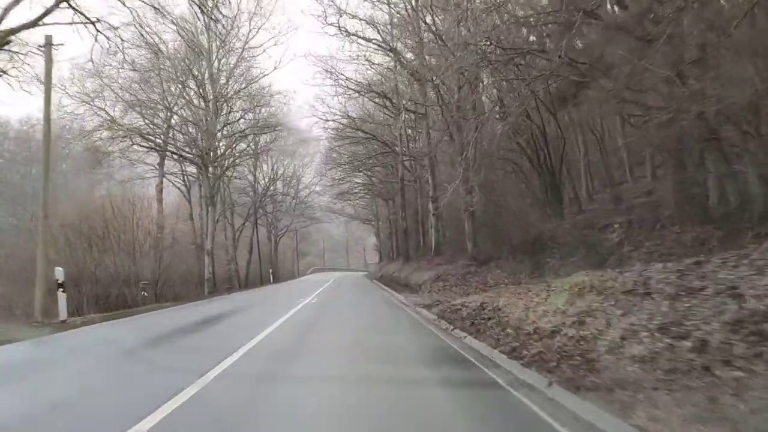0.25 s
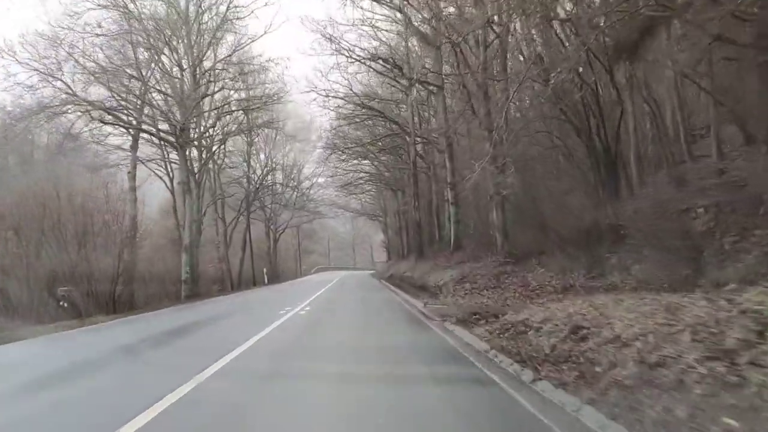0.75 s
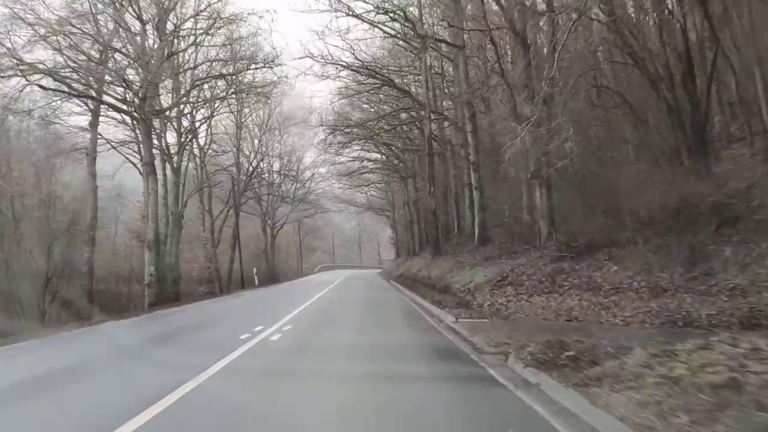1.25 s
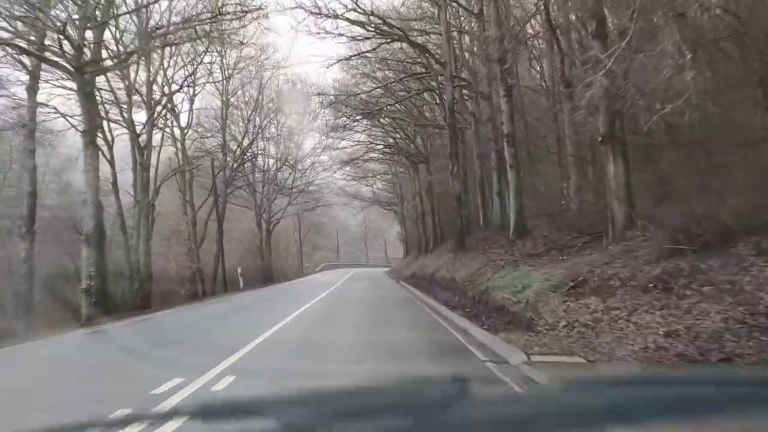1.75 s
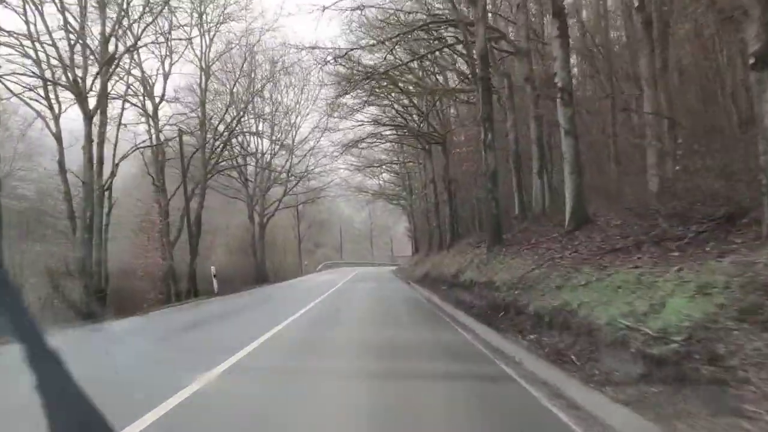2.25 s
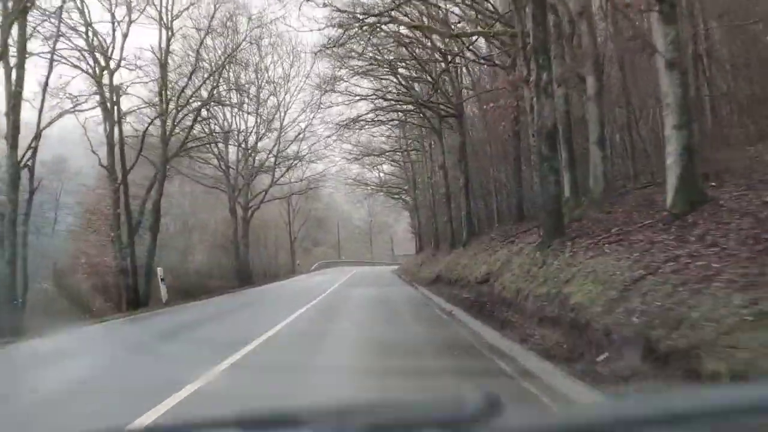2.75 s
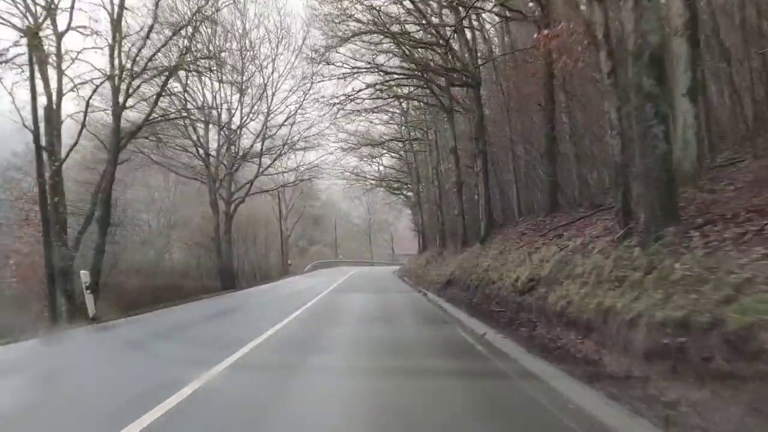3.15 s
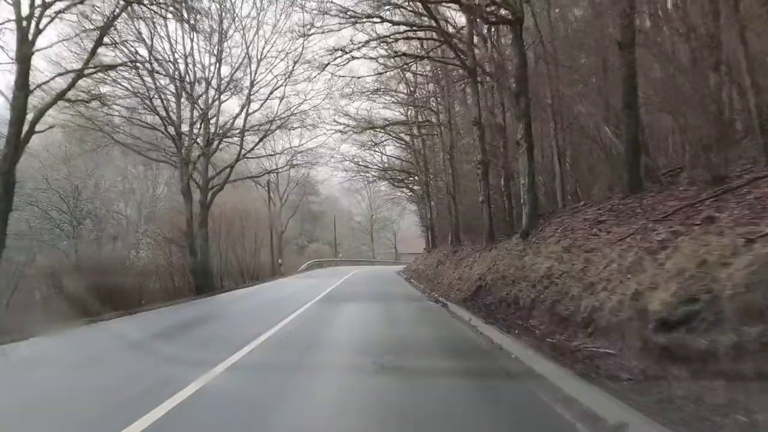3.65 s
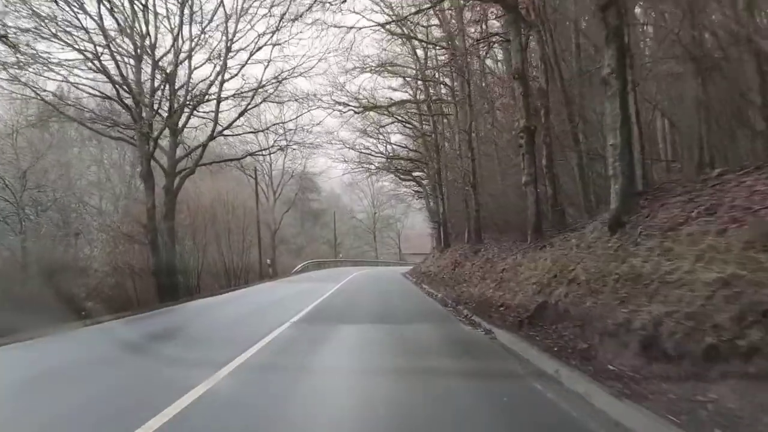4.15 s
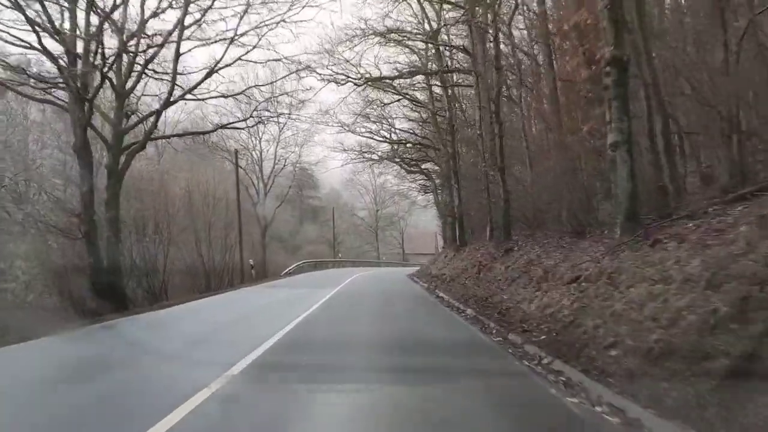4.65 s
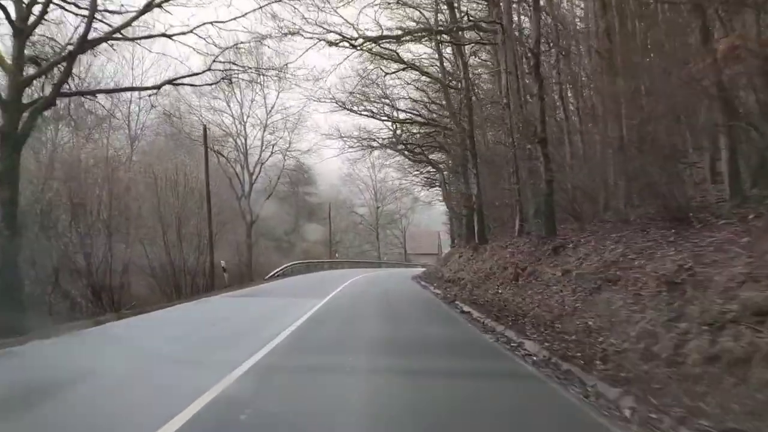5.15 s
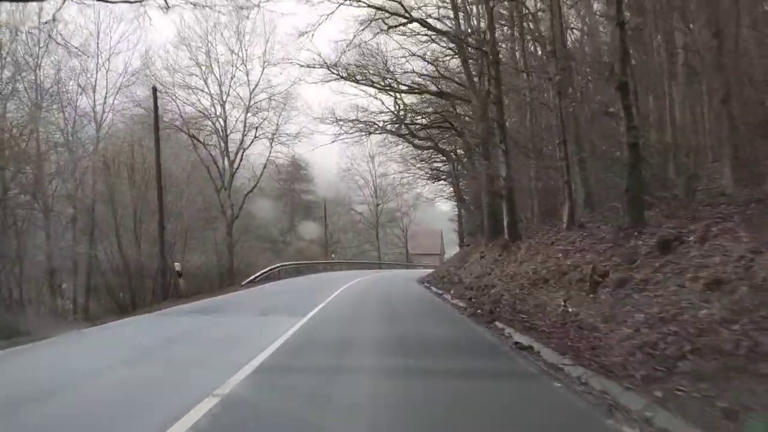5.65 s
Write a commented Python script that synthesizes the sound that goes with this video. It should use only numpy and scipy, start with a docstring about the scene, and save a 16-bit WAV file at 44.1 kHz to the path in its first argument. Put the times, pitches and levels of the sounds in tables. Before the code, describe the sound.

Low road rumble and tyre hum fill the cabin of a moving car, with light spray hissing outside. The engine hum is strongest at first and then sinks away. The windscreen wipers make a single pass, knocking dully twice and whirring quietly. Later, rougher asphalt brings a deep boom and a thud, while a small metal object clinks faintly and plastic trim ticks near the microphone inside the car.

```python
"""An engine drones inside a car coasting on a wet country road, its firing harmonics fading as the
driver lifts off. The tyres hum on multiples of the wheel rate, and the road forces the body into
rumble, roar and a resonant boom. Spray and air hiss outside. The wipers sweep up and back with two
dull knocks. Trim ticks and something rustles faintly; near the end a small metal object clinks."""
import sys
import numpy as np
from scipy import signal
from scipy.fft import rfft, irfft
from scipy.io import wavfile
from scipy.ndimage import uniform_filter1d

SR = 44100
rng = np.random.default_rng(int(sys.argv[2]) if len(sys.argv) > 2 else 0)


def master_out(mix):
    """Clip the mix to full scale and print it as 16-bit PCM to the path in sys.argv[1]."""
    frames = np.transpose(np.atleast_2d(mix))
    ceiling = np.clip(frames, -1, 1)
    pcm = np.round(ceiling * 32767).astype(np.int16)
    wavfile.write(sys.argv[1], SR, pcm)


N = 259749
TIME = np.arange(N) / SR
BINS_HZ = np.fft.rfftfreq(N, 1 / SR)


def gain_of(db):
    """Decibels to amplitude ratio."""
    return 10 ** (np.asarray(db) / 20)


def unit_rms(x):
    """Normalisation to an rms of one."""
    return x / np.sqrt(np.mean(abs(x) ** 2) + 1e-20)


def at_hz(points, hz):
    """Interpolation of a spectrum on a log-frequency axis."""
    f, value = np.transpose(points)
    return np.interp(np.log(hz + 1), np.log(f + 1), value)


def curves(rows):
    """Linear interpolation of each column of a timed table, one value a sample."""
    time_s, *columns = np.transpose(rows)
    return [np.interp(TIME, time_s, column) for column in columns]


def add(mix, start_s, sound):
    """Superposition of a stereo sound on the mix."""
    part = mix[:, max(round(start_s * SR), 0):][:, :sound.shape[1]]
    part += sound[:, :part.shape[1]]


def pan(balance_db):
    """Channel gains for a level difference; balance is left minus right."""
    return gain_of([[balance_db / 2], [-balance_db / 2]])


def drift(rate_hz):
    """Random modulation: low-passed noise of unit rms."""
    return unit_rms(irfft(rfft(rng.standard_normal(N)) * np.exp(-(BINS_HZ / rate_hz) ** 2), N))


def scatter(spectrum, t60_s, tilt_db_per_octave=0):
    """Diffuse scattering: the cabin spreads a click into exponentially decaying noise."""
    t, hz = np.arange(SR // 5) / SR, np.fft.rfftfreq(SR // 5, 1 / SR)
    shape = gain_of(at_hz(spectrum, hz) + tilt_db_per_octave * np.log2(np.maximum(hz, 4000) / 8000))
    noise = irfft(rfft(rng.standard_normal((2, len(t)))) * shape, len(t))
    return unit_rms(noise) * gain_of(-60 * t / t60_s)


# Likeness of left and right: frequency_hz, correlation (clipped to +-1 in use)
COHERENCE = [(35, 1.16), (60, 1.2), (92, 0.66), (140, 1.3), (210, 0.56), (330, 0.88), (500, 0.39),
             (770, -0.18), (1170, -0.21), (1790, 0.09), (4000, 0)]
# Level difference across the cabin: frequency_hz, balance_db
CABIN_BALANCE = [(60, 0), (500, 0.5), (770, 0.5), (1170, -1), (1790, -0.5), (2740, -3.5), (4190, -6),
                 (6400, -13), (8000, 17.5), (9500, 5.3), (15000, -7.5)]
def cabin_noise(spectrum):
    """Spatial coherence: left and right noise are alike in the bass, unrelated in the treble."""
    common, independent = rfft(rng.standard_normal((2, N)))
    correlation = np.clip(at_hz(COHERENCE, BINS_HZ), -1, 1)
    right = correlation * common + np.sqrt(1 - correlation ** 2) * independent
    lean = gain_of(at_hz(CABIN_BALANCE, BINS_HZ) / 2)
    pair = irfft(np.array([common * lean, right / lean]) * gain_of(at_hz(spectrum, BINS_HZ)), N)
    return pair / pair.mean(0).std()


def partial(hz, waver, waver_hz):
    """A tone under random amplitude and phase modulation; coherence sets the left-right phase angle."""
    cycles = np.cumsum(hz) / SR + rng.random()
    wander = unit_rms(1 + waver * (drift(waver_hz) + 1j * drift(waver_hz)))
    angle = np.arccos(np.clip(at_hz(COHERENCE, hz.mean()), -1, 1)) * rng.choice([-.5, .5])
    phase = 2 * np.pi * cycles + np.array([[angle], [-angle]])
    return np.sqrt(2) * (wander * np.exp(1j * phase)).real


def reflections(x, echo_db=-14, spread_s=.012, count=8):
    """Comb filtering: early echoes from glass and dashboard ripple the spectrum."""
    taps = np.zeros((2, SR // 20))
    delays = (rng.uniform(.05, 1, (2, count)) * spread_s * SR).astype(int)
    echoes = gain_of(echo_db) * rng.choice([-1, 1], delays.shape) / np.sqrt(count)
    np.put_along_axis(taps, delays, echoes, 1)
    # long waves fill the small cabin evenly
    taps = signal.sosfilt(signal.butter(2, 900, "highpass", fs=SR, output="sos"), taps)
    taps[:, 0] += 1  # direct sound
    return signal.oaconvolve(x, taps / np.linalg.norm(taps, axis=1, keepdims=True), axes=1)[:, :N]


# Soft rubs in the cabin: start_s, length_s, level_db, balance_db
RUBS = [(0.032, 0.24, -64, -3.5), (0.264, .12, -60.5, 0), (5.774, 0.099, -61, -1)]
# Rubbing spectrum: frequency_hz, relative_db
RUB_SPECTRUM = [(1500, -20), (3500, 1), (6000, 4), (8000, 2), (9500, -16), (15000, -14)]
def rustles(grain_db=4):
    """Friction noise: brief rubbing gives bright sound in uneven clumps."""
    clumps = rng.standard_normal((2, N)) * gain_of(grain_db * drift(90))
    grains = unit_rms(irfft(rfft(clumps) * gain_of(at_hz(RUB_SPECTRUM, BINS_HZ)), N))
    envelope = np.zeros((2, N))
    for start_s, length_s, level_db, balance_db in RUBS:
        travel = np.clip((TIME - start_s) / length_s, 0, 1)
        envelope += gain_of(level_db) * pan(balance_db) * np.sqrt(abs(np.sin(np.pi * travel)))
    return envelope * grains


# Ticks of the trim: start_s, level_db, tilt_db_per_octave, balance_db
TRIM_TICKS = [(.714, -52.5, -10, -3), (1.637, -58, -11, -10), (1.923, -59, -6, 5), (2.768, -56, -11, -6),
              (3.305, -57, -13, -6), (4.491, -51, -6, 1), (5.494, -54, 14, -6), (5.786, -55, 1, -3),
              (5.798, -52, -4, -6), (5.822, -59, 2, -4), (5.847, -52, -4, -4), (5.871, -49.5, 4, -4)]
# Tick spectrum: frequency_hz, relative_db
TICK_SPECTRUM = [(1500, -25), (3500, -9.5), (6000, -0.5), (7800, 0.5), (9500, -9), (12000, -11),
                 (16000, -10)]
def ticks(t60_s=0.049):
    """Impulsive excitation: plastic trim ticks dryly as the body flexes."""
    out = np.zeros((2, N))
    for start_s, level_db, tilt, balance_db in TRIM_TICKS:
        add(out, start_s, gain_of(level_db) * pan(balance_db) * scatter(TICK_SPECTRUM, t60_s, tilt))
    return out


# Touches of a loose metal object: start_s, relative_db
TOUCHES = [(5.321, -44), (5.342, -49), (5.36, -41), (5.494, -53)]
# Its modes: frequency_hz, relative_db, t60_s, balance_db
METAL_MODES = [(5740, -20, .07, -7), (7500, -8, .06, 10), (7700, -2, 0.059, 13), (7870, -2, .07, 9),
               (10200, -13, .05, -8), (10800, -11, .035, -3), (11200, -17, .04, -6), (11800, -15, .05, -6),
               (12600, -15, .035, -5), (13300, -7, .08, -10), (13900, -3, .08, -10)]
# Contact noise: frequency_hz, relative_db
CONTACT_SPECTRUM = [(2000, -35), (6700, -20), (7700, -2), (9200, -21), (11000, -2.5), (12800, -4),
                    (13600, 4), (14400, -12), (16000, -16)]
def clinks(ring_db=-8, contact_db=-4):
    """Free vibration: each touch gives a burst of noise and rings the damped modes of thin metal."""
    out, t = np.zeros((2, N)), np.arange(SR // 5) / SR
    for start_s, touch_db in TOUCHES:
        ring = sum(pan(balance_db) * gain_of(mode_db - 60 * t / t60_s)
                   * np.sin(2 * np.pi * (hz * t + rng.random((2, 1))))
                   for hz, mode_db, t60_s, balance_db in METAL_MODES)
        contact = pan(-5) * scatter(CONTACT_SPECTRUM, t60_s=.05)
        add(out, start_s, gain_of(touch_db) * (gain_of(ring_db) * ring + gain_of(contact_db) * contact))
    return out


# Wiper strokes, up and back: start_s, length_s, start_pitch_hz, end_pitch_hz, level_db
WIPER_STROKES = [(1.777, .46, 407, 398.5, -48.5), (2.502, 0.41, 388.3, 405, -46)]
def wipers():
    """Motor hum under load: the pitch glides through each stroke with the drag of the blades."""
    out = np.zeros((2, N))
    for start_s, length_s, start_hz, end_hz, level_db in WIPER_STROKES:
        travel = np.clip((TIME - start_s) / length_s, 0, 1)
        hum = partial(start_hz + (end_hz - start_hz) * travel, waver=0.21, waver_hz=13)
        out += gain_of(level_db) * np.sin(np.pi * travel) * hum
    return out


# Course of the rolling noise, for spray and road: time_s, surface_db, wet_db
ROLLING = [(0, -32.5, -61.5), (.45, -34, -62), (1.4, -34.5, -63), (2.1, -36.5, -63), (2.4, -31, -63.5),
           (2.9, -36.5, -63.5), (3.6, -38.5, -63), (4.3, -36.5, -63.5), (5.1, -37.5, -64),
           (5.45, -29.5, -65.5), (5.65, -33.5, -66), (5.89, -29.5, -62.5)]
# Spray spectrum: frequency_hz, relative_db
SPRAY_SPECTRUM = [(900, -13.5), (2000, 5.5), (3000, 7), (3900, 0), (5000, -2), (6200, -2), (7100, -6.5),
                  (7900, -9), (8700, -21), (10000, -37), (15500, -39)]
def spray(hiss_db=2.5, flicker_db=0.86, floor_db=-70):
    """Flow noise: air and water hiss past the glass, over a steady white noise floor."""
    _, wet_db = curves(ROLLING)
    hiss = gain_of(wet_db + hiss_db + flicker_db * drift(37)) * cabin_noise(SPRAY_SPECTRUM)
    return hiss + gain_of(floor_db) * pan(-1.2) * rng.standard_normal((2, N))


# Roar through the floor: frequency_hz, relative_db
ROAR_SPECTRUM = [(35, -28.5), (55, 2.5), (75, -3.5), (100, 0), (135, -2), (175, -6), (230, -5), (290, -14),
                 (400, -17.5), (800, -68)]
# Panel and tyre-cavity resonances: frequency_hz, relative_db
PANEL_SPECTRUM = [(150, -38), (300, -4.5), (390, -1.5), (450, -4), (510, -2), (565, 0.5), (680, -6),
                  (790, -10), (890, -11.5), (970, -15), (1500, -17.5), (2700, -23), (3600, -38.5),
                  (6000, -59)]
def road(roar_db=-2, cabin_db=-45, flutter_db=.5, follow=0.12):
    """Structure-borne noise: coarse asphalt drives the floor, the panels and the air in the tyres."""
    surface_db, _ = curves(ROLLING)
    roar = gain_of(surface_db + roar_db) * cabin_noise(ROAR_SPECTRUM)
    panels_db = cabin_db + follow * (surface_db - surface_db.mean()) + flutter_db * drift(6.9)
    return roar + gain_of(panels_db) * cabin_noise(PANEL_SPECTRUM)


# Blows from wipers and road: start_s, relative_db, tilt_db_per_octave, rise_s
BLOWS = [(1.624, -37.5, 6, 0.00067), (1.652, -26.5, 0, 0.0048), (2.356, -28, -4, 0.0029),
         (2.402, -24.5, -1.5, 0.005), (5.479, -26, -7.5, 0.019)]
# Modes of the car body: frequency_hz, relative_db, t60_s
BODY_MODES = [(43.5, -4.5, 0.32), (76, 1, 0.25), (134.8, 1.5, 0.19), (217.5, 1.5, 0.11), (303, -1, 0.071),
              (467, -2.5, 0.062), (874, -14, 0.066), (1054, -18.5, .04)]
def knocks():
    """Modal response: blows ring the low modes of the body; each blow swells in over its own rise time."""
    out, t = np.zeros((2, N)), np.arange(SR // 3) / SR
    for start_s, blow_db, tilt, rise_s in BLOWS:
        ring = sum(gain_of(mode_db + tilt * np.log2(hz / 200) - 60 * t / t60_s)
                   * np.sin(2 * np.pi * (hz * t + rng.random()))
                   for hz, mode_db, t60_s in BODY_MODES)
        add(out, start_s, gain_of(blow_db) * pan(4.5) * ring * (1 - np.exp(-t / rise_s)))
    return out


BOOM_HZ = 38.5
# Bumps in the road: peak_s, level_db
ROAD_BUMPS = [(1.11, -23), (2.04, -27), (2.43, -25), (3.23, -26), (4.02, -24), (4.52, -15), (5.5, -17)]
def bumps(rise_s=.028, fall_s=.04):
    """Transient resonance: each bump swings the body for a few cycles, in phase left and right."""
    out = np.zeros(N)
    for peak_s, level_db in ROAD_BUMPS:
        swell = np.exp(-((TIME - peak_s) / np.where(TIME < peak_s, rise_s, fall_s)) ** 2 / 2)
        out += gain_of(level_db) * swell * np.sqrt(2) * np.sin(2 * np.pi * (BOOM_HZ * TIME + rng.random()))
    return out


# Shaking by the uneven road: time_s, level_db
SHAKE_LEVEL = [(0, -31), (.6, -25.5), (1.7, -28.5), (2.4, -27.5), (3.7, -31), (4.5, -27), (5.4, -27.5),
               (5.89, -32)]
# Response of the sprung body: frequency_hz, relative_db
SHAKE_SPECTRUM = [(4, -19), (8, -8), (14, -5), (20, -5.5), (26, 5), (36, 11.5), (46, 9.5), (56, -2.5),
                  (70, -16), (120, -74)]
def rumble(steadiness=0.4, boom_db=-24, rough_start_s=4.1, rough_end_s=5.6, rise_s=.3, fall_s=.13):
    """Forced vibration: the body shakes on its springs and booms at resonance over a rough stretch."""
    (level_db,) = curves(SHAKE_LEVEL)
    shake = cabin_noise(SHAKE_SPECTRUM)
    envelope = np.sqrt(abs(uniform_filter1d(shake.mean(0) ** 2, size=5000)) + 1e-6)
    shake = unit_rms(shake / envelope ** steadiness)  # partly evens out the random swells
    rough = np.clip(np.minimum((TIME - rough_start_s) / rise_s, (rough_end_s - TIME) / fall_s), 0, 1)
    boom = partial(np.full(N, BOOM_HZ), waver=.45, waver_hz=11)
    return gain_of(level_db) * shake + gain_of(boom_db) * rough * boom


# Wheel speed, for tyres and engine: time_s, rotation_hz
WHEEL_RATE = [(0.0, 8.6), (0.7, 8.85), (1.4, 8.16), (2.1, 8.6), (2.8, 8.18), (3.5, 8.23), (4.3, 8.227),
              (5.1, 8.26), (5.89, 8.34)]
# Tread harmonics: wheel_multiple, level_db
TYRE_HARMONICS = [(8, -44), (9, -47.5), (10, -47.5), (11, -47), (16, -46.5), (17, -48.5), (20, -58),
                  (21, -51), (22, -54.5), (25, -56.5), (26, -56), (27, -52.5), (28, -63.5), (29, -50),
                  (31, -52), (32, -47.5), (33, -61), (35, -59), (40, -59.5), (47, -63), (57, -66),
                  (58, -59.5), (64, -56.5), (65, -56), (66, -55.5), (67, -56), (69, -57.5), (72, -59),
                  (74, -65)]
# Effect of the road surface on the hum: time_s, gain_db
TREAD_GAIN = [(0, -4), (1.5, -3), (2.3, -2), (3, 1), (4.2, 4.5), (5, 1.5), (5.5, -3.5), (5.89, -8)]
def tyres(swell_order=30, swell_spread=9):
    """Periodic excitation: the tread repeats each turn, so it hums on harmonics of the wheel rate."""
    (wheel_hz,), (tread_db,) = curves(WHEEL_RATE), curves(TREAD_GAIN)
    out = np.zeros((2, N))
    for order, level_db in TYRE_HARMONICS:
        # the road surface mostly changes the middle harmonics
        share = np.exp(-((order - swell_order) / swell_spread) ** 2)
        out += gain_of(level_db + share * tread_db) * partial(order * wheel_hz, waver=0.34, waver_hz=1.9)
    return out


# Engine load as a sound level: time_s, load_db
ENGINE_LOAD = [(0.0, -25), (0.5, -23), (1.0, -20.5), (1.4, -26), (1.8, -28.5), (2.3, -29), (2.8, -31.5),
               (3.3, -30.5), (4.0, -43), (5.0, -39.5), (5.88, -29)]
# Engine orders: firing_multiple, relative_db (at peak load), load_share (of the change in load_db)
ENGINE_ORDERS = [(1, -0.5, 0.94), (1.5, -29, -0.32), (2, -21, 0.098), (3, -34.5, -0.21), (4, -28, 0.8),
                 (5, -31.5, 0.6), (6, -30, 0.71)]
def engine(firings_per_turn=6.672):
    """Periodic firing, geared to the wheels: the fundamental fades most as the load drops."""
    (wheel_hz,), (load_db,) = curves(WHEEL_RATE), curves(ENGINE_LOAD)
    firing_hz = firings_per_turn * wheel_hz
    peak_db = load_db.max()
    out = np.zeros((2, N))
    for order, relative_db, load_share in ENGINE_ORDERS:
        level_db = peak_db + relative_db + load_share * (load_db - peak_db)
        out += gain_of(level_db) * partial(order * firing_hz, waver=0.2, waver_hz=5.2)
    return out


def scene():
    """Superposition of all sources at the front seat."""
    driving = engine() + tyres() + rumble() + reflections(road() + spray())
    return driving + wipers() + knocks() + clinks() + ticks() + rustles() + bumps()


def record(dry):
    """Band limiting: a linear-phase low-pass at 15.8 kHz."""
    lowpass = signal.firwin(511, 15800, window=("kaiser", 9), fs=SR)
    return signal.oaconvolve(dry, lowpass[None], "same")


dry = scene()
out = record(dry)
master_out(out)
```